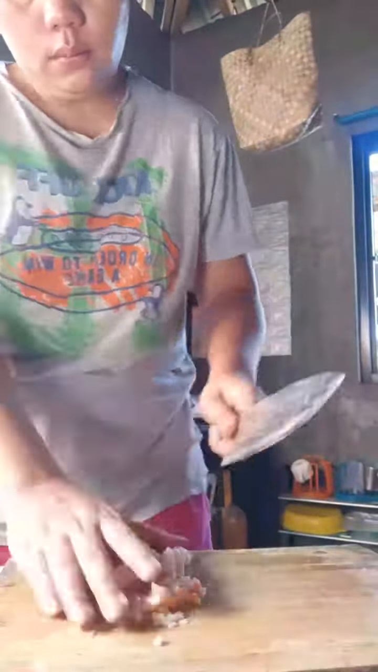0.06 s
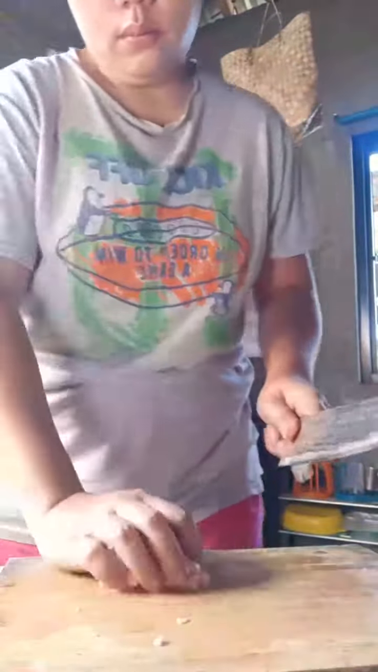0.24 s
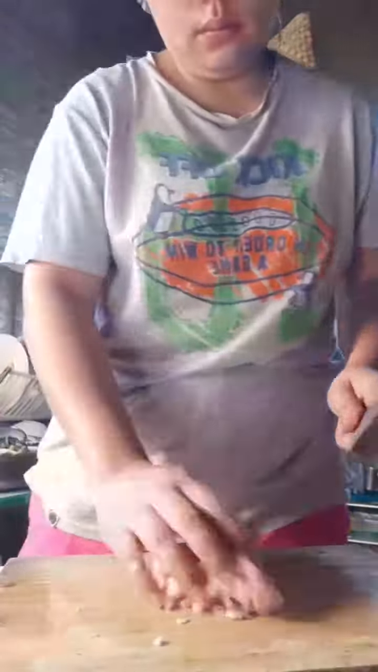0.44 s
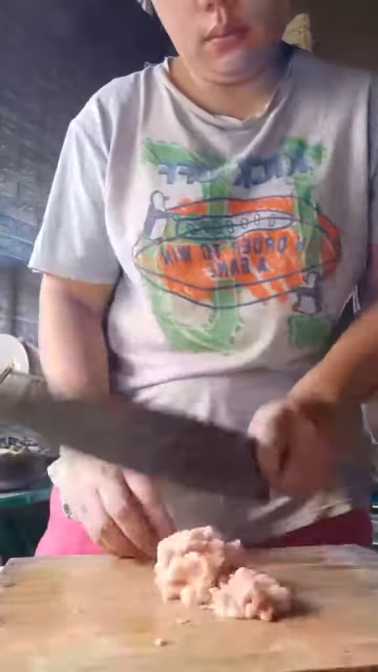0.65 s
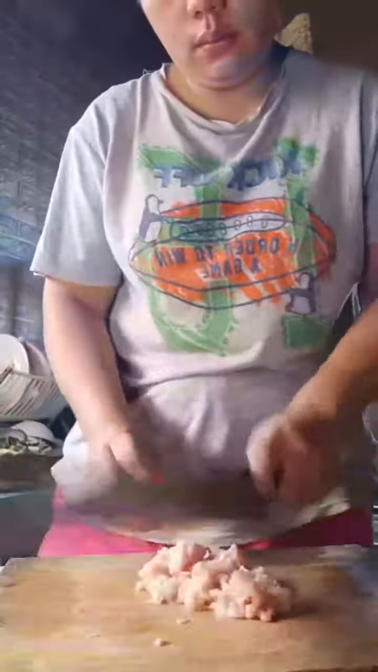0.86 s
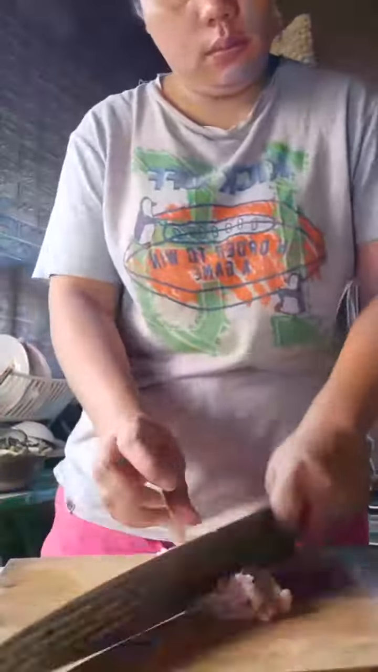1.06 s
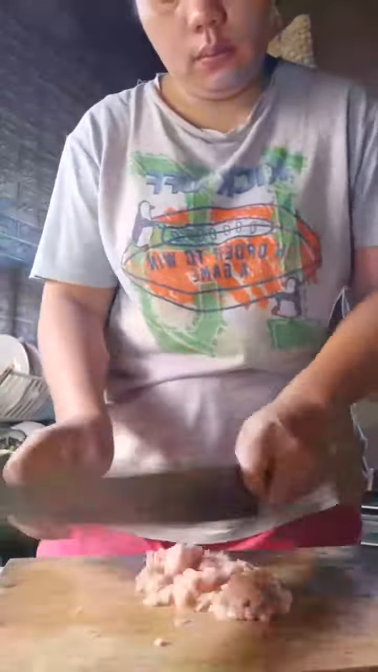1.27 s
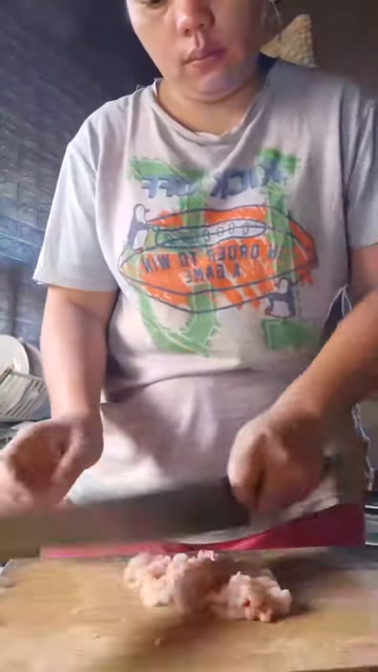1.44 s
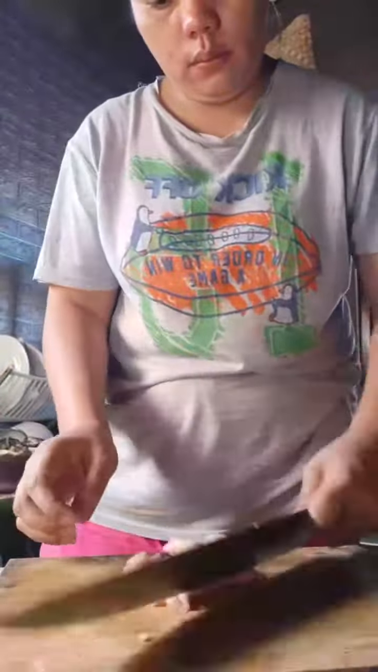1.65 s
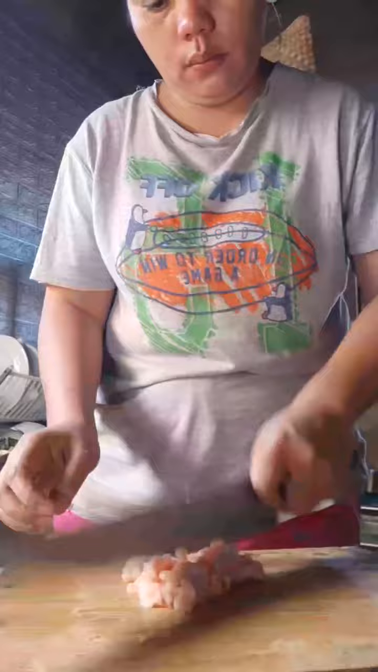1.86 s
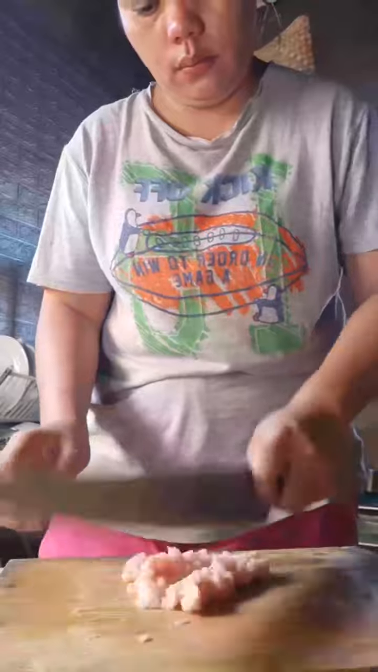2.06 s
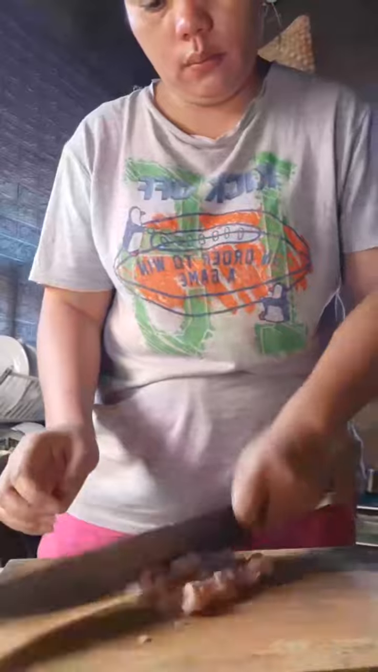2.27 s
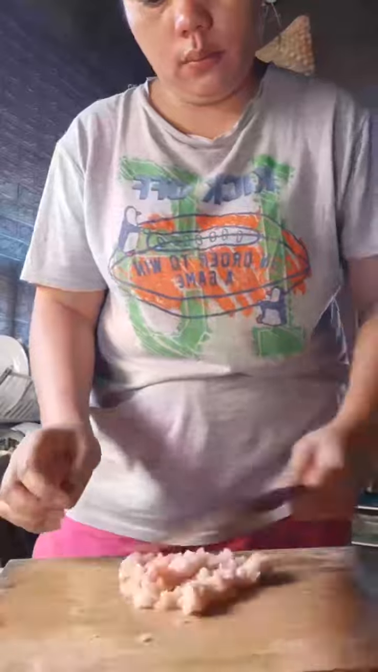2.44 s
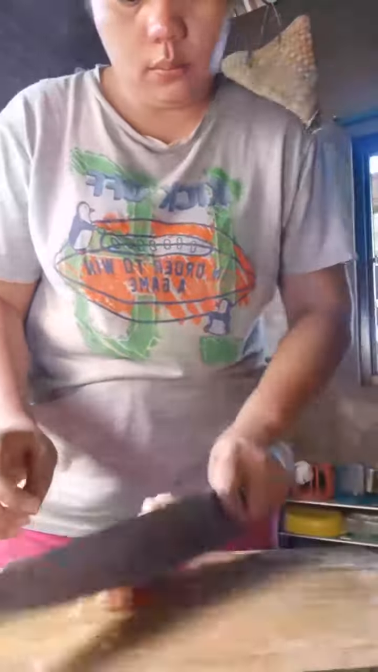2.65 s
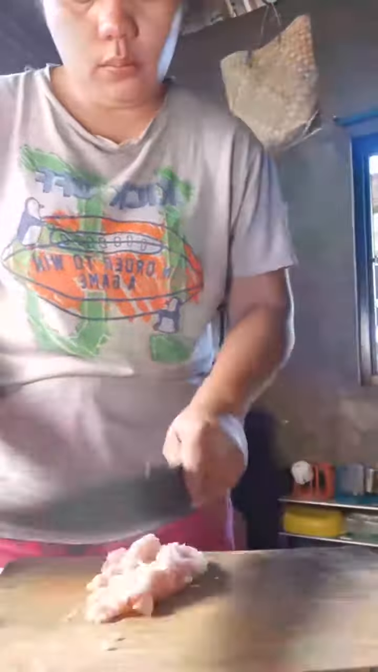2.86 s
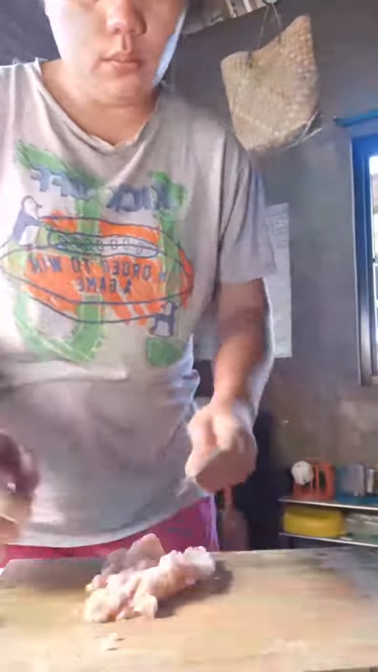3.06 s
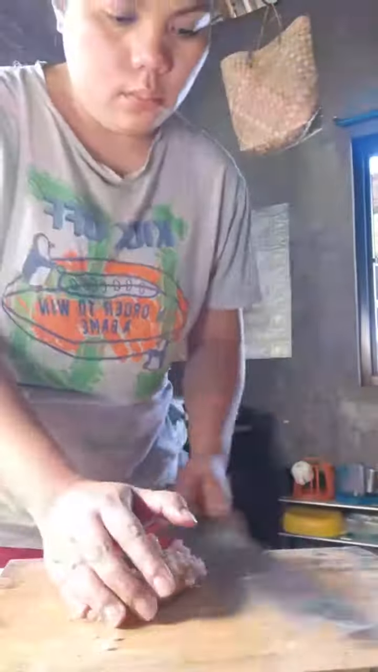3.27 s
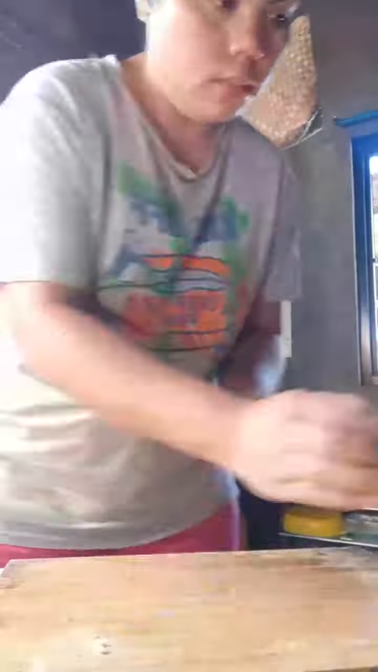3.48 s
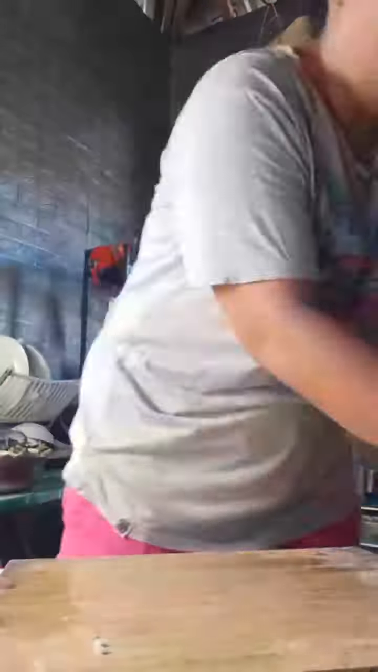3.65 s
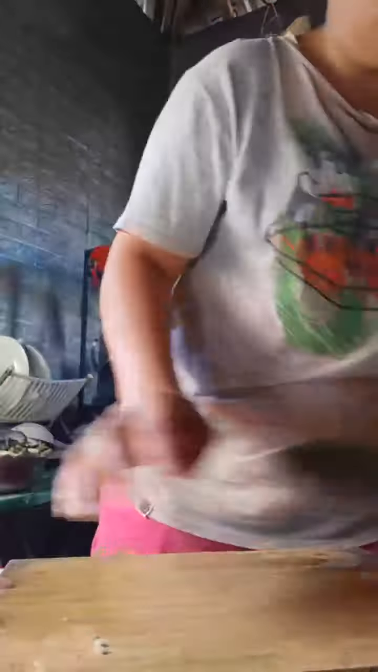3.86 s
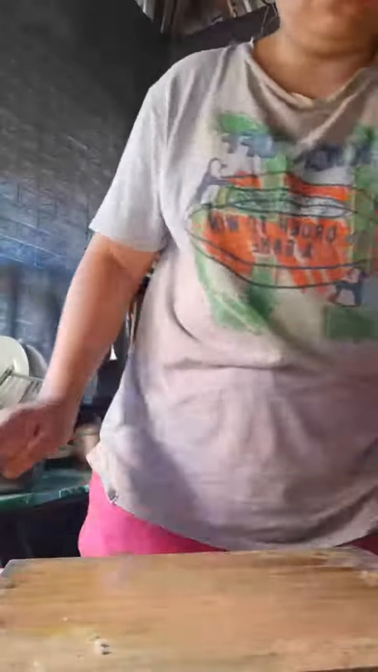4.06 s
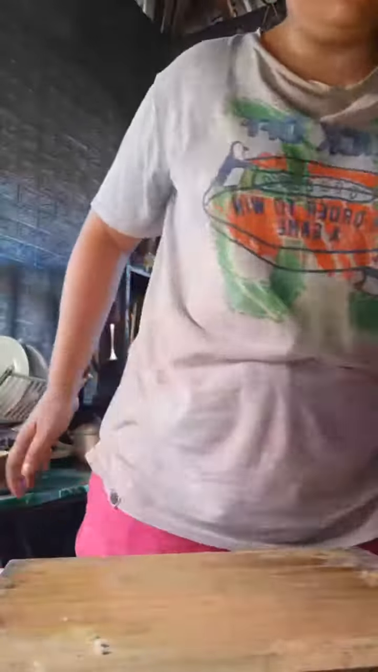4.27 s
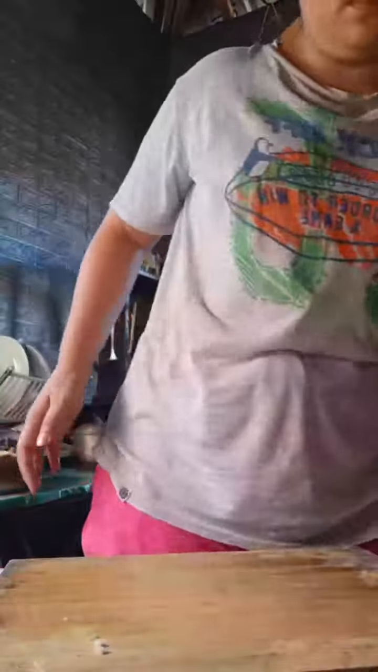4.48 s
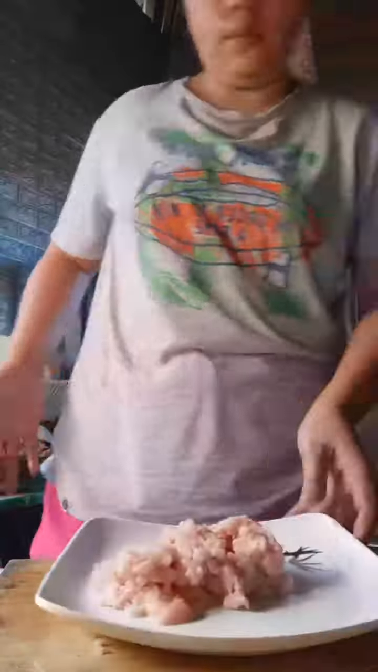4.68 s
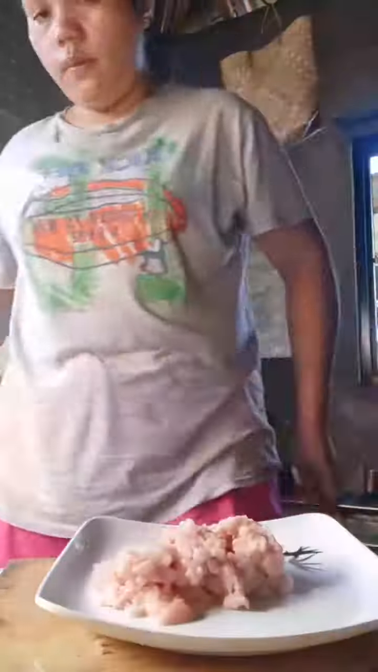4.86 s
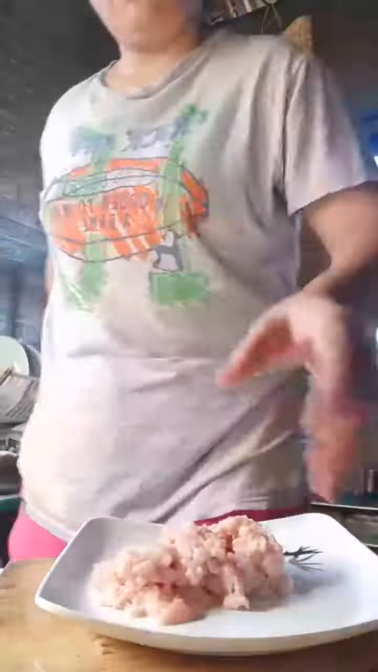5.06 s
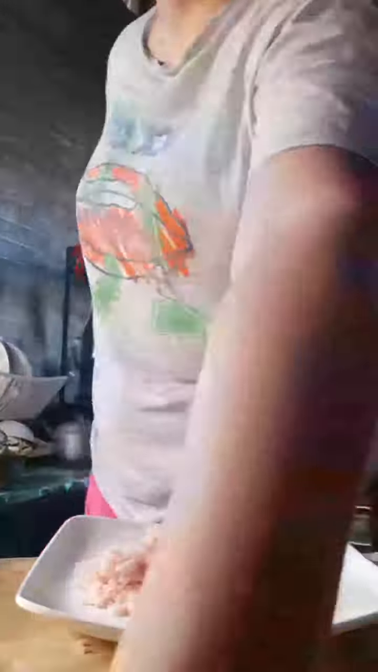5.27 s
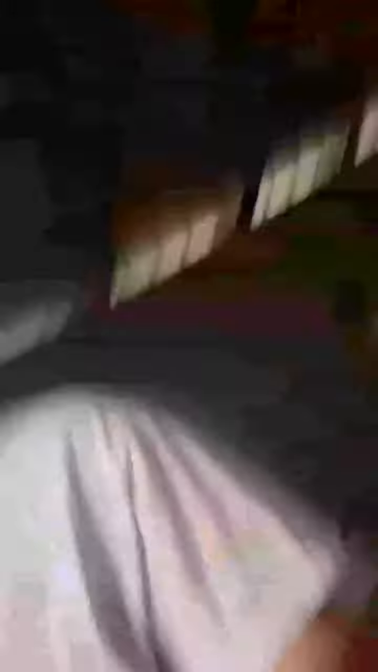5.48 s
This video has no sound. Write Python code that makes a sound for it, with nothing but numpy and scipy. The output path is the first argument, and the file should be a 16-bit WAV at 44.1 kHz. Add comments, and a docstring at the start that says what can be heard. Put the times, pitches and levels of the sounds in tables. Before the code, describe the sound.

A heavy knife strikes a wooden board once at the very start, close to the microphone in a home kitchen. From about 0.7 seconds it minces raw meat rapidly, around eleven strokes a second, each a sharp crack and woody thud with a brief steel ring and a short echo. The strokes ease near 1.7 seconds, resume at 1.9, thin out after 2.5 and end with two hard chops around 3.1 and a light tick at 3.4. Faint hoarse hoots come from far away around 4 and 5 seconds. The board knocks down at 4.2 and 4.3 seconds, and a plate clinks briefly at 4.7. At about 5.4 seconds a hand takes hold of the microphone with a rustle and a sharp click. A quiet, swelling rumble runs underneath, with occasional soft hand rustles and chicks peeping faintly outside.

```python
"""Over a low, swelling rumble, a heavy knife starts mincing raw meat on a thick wooden board, near a phone.
In each stroke the edge cracks through the meat, the blade thuds on the wood, the steel sings briefly
and the open kitchen answers. Chicks peep outside and a hand rustles now and then. The chopping stops
by 3.5 s, and hoarse hoots start far away. The board is set down at about 4.2 s, then a plate clinks
down at 4.7 s. At the end the hand takes hold of the phone."""
import sys
import numpy as np
from scipy import signal
from scipy.fft import rfft, irfft, next_fast_len
from scipy.io import wavfile
from scipy.ndimage import uniform_filter1d

SR = 44100
rng = np.random.default_rng(int(sys.argv[2]) if len(sys.argv) > 2 else 0)


def wav_out(sig):
    """Save sig, one row per channel (or a flat mono array), as 16-bit PCM at SR to the path in sys.argv[1]."""
    wavfile.write(sys.argv[1], SR, np.round(np.clip(np.atleast_2d(sig).T, -1, 1) * 32767).astype(np.int16))


N = 243414
T = np.arange(N) / SR

# How the background swells: t/s, rumble level/dB, hiss level/dB
BACKGROUND_LEVELS = [(0.0, -49, -57), (0.15, -53, -72.5), (0.38, -57.5, -70.5), (0.57, -50.5, -68),
                     (0.75, -45.5, -65), (0.95, -63, -72.5), (1.6, -50, -71), (1.7, -58, -76),
                     (1.85, -58, -77.5), (2.4, -55, -75.5), (2.65, -59, -74), (3.1, -52.5, -68),
                     (3.22, -56, -78.5), (3.38, -73, -78.5), (3.6, -52, -68.5), (4.15, -47.5, -69.5),
                     (4.29, -41.5, -57), (4.4, -53.5, -76), (4.65, -46.5, -63), (5.0, -51, -62.5),
                     (5.27, -44, -62), (5.52, -42.5, -56)]
# Tone of the noise the background is made from: f/Hz, level/dB
BACKGROUND_COLOUR = [(15, -43.5), (25, -7.5), (146, 3.5), (250, -2), (420, -6.5), (829, -11), (1140, -16.5),
                     (1800, -27.5), (2800, -25), (5380, -27), (6800, -40), (7700, -30), (9400, -56.5),
                     (12000, -38.5), (14800, -69.5)]
# Weight landing on wood: t/s, level/dB, push length/ms, pitch factor (held to 0.6-1.9),
# lift of the higher notes/(dB per octave), which depends on where the blow lands
THUDS = [(0.004, -28, 2.5, 0.64, 17), (0.0474, -3, 1.26, 1.43, -6.5), (0.7104, -2, 4.83, 1.73, -2),
         (0.7168, -2, 1.6, 0.88, -2.5), (0.7243, -6, 1.5, 1, -7.5), (0.7983, -14.5, 4.6, 1.05, 0),
         (0.888, -6.5, 1.47, 1.05, -2.5), (0.979, -6.5, 2.74, 1.01, 1.5), (1.0702, -10, 2.2, 0.82, -4.5),
         (1.1632, -2.5, 2, 1.18, -5), (1.2494, -2.5, 1.65, 0.77, -2), (1.3377, -11.5, 1.44, 1.97, -15),
         (1.3417, -7, 2.25, 0.81, -5.5), (1.355, -23.5, 2.2, 1.2, -2), (1.4279, -13.5, 2, 0.6, -6.5),
         (1.5137, -2.5, 3.27, 1.37, 5.5), (1.5963, -9.5, 0.95, 1.57, -6), (1.7089, -22, 1.86, 0.88, 0.5),
         (1.9479, -2.5, 1.35, 0.65, -4.5), (2.0383, -5, 1.5, 0.55, -3), (2.1292, -3, 2.16, 1.24, -2.5),
         (2.2276, -11.5, 1.15, 0.91, -9), (2.3077, -8, 2.56, 1.09, 3.5), (2.397, -11.5, 3.75, 1.25, 5),
         (2.4857, -3, 1.12, 0.98, 2), (2.511, -30, 3.2, 1.1, 4), (2.5994, -20.5, 1.64, 0.63, -5),
         (2.7333, -28, 1.07, 1.51, -9.5), (2.8437, -8, 2.84, 1.51, 2.5), (2.934, -31, 4.3, 1.1, -1),
         (3.0172, -3, 2.02, 0.75, -2), (3.1045, 0, 1.5, 0.84, -10), (3.3636, -35.5, 5.1, 1.26, 8),
         (4.1777, -14, 1.5, 1.16, -7), (4.1948, -19, 0.81, 0.57, 4.5), (4.2067, -18, 0.59, 0.52, -2),
         (4.2095, -21, 2.2, 0.97, 0), (4.269, -33, 1.5, 1.1, 0), (4.282, -24, 2.6, 2.2, 3),
         (4.29, -5.5, 2.3, 1.21, 1), (4.2975, -15, 2.4, 0.97, 0), (4.306, -20, 2.4, 0.97, 0),
         (4.316, -46, 1.3, 0.51, -14), (4.7286, -25, 0.92, 0.47, 1), (4.741, -29.5, 2.7, 1.53, -7),
         (4.753, -26, 1.3, 1.15, 4.5), (4.793, -30.5, 1.25, 1.7, -7)]
# The board's own notes, which each blow retunes and damps: base f/Hz, level/dB, base ring time/s
BOARD_NOTES = [(70.8, -4, 0.017), (148, 3, 0.038), (252.8, -2.5, 0.037), (400.7, -7.5, 0.036),
               (555, -6, 0.032), (972, -20, 0.027), (1289, -17, 0.013)]
# Tone of the room's echo: f/Hz, level/dB
ROOM_COLOUR = [(60, -6), (250, -2.5), (950, -1), (2500, -2), (6000, -5.5), (12000, 0.5)]
# Sharp touches of edge, board or plate; each level is relative within its own layer:
# t/s, crack level/dB, crack fade/ms, rap level/dB, clatter level/dB, blade song level/dB
CONTACTS = [(0.0461, -16.5, 0.98, -38, -20, -30), (0.7124, -13.5, 1.1, -31, -44, -20.5),
            (0.717, -18.5, 1.5, -19, -17.5, -27), (0.7223, -18.5, 1.8, -21, -44, -28.5),
            (0.794, -28.5, 8.2, -59, -40.5, -44), (0.8847, -31.5, 0.97, -20, -61, -39),
            (0.8877, -22, 4, -47, -36.5, -36), (0.9046, -34, 1.4, -34, -77, -73),
            (0.974, -8, 0.78, -11, -30, -40), (0.9774, -17, 1.7, -55, -73, -35),
            (0.9811, -20.5, 1.8, -37, -74, -45), (0.9914, -27, 1.8, -50, -76, -61),
            (1.067, -7.5, 0.33, -14.5, -27.5, -45), (1.1601, -13.5, 3.5, -21.5, -33.5, -43),
            (1.163, -20.5, 2.2, -18, -45.5, -34.5), (1.2459, -13, 1.4, -15.5, -26, -37),
            (1.3379, -12.5, 3.3, -12.5, -20.5, -21.5), (1.425, -17, 1, -13.5, -34, -31),
            (1.433, -33, 1.5, -55, -47, -60), (1.514, -12, 1.6, -11.5, -20.5, -41.5),
            (1.527, -29.5, 4, -45, -30, -54.5), (1.5965, -18.5, 1.3, -51, -39.5, -46),
            (1.7057, -23, 1.75, -31.5, -40.5, -60), (1.947, -12.5, 1, -12.5, -17.5, -29.5),
            (2.0369, -25, 2.5, -22, -33.5, -38), (2.1276, -19, 4.1, -17, -29, -37),
            (2.1445, -25, 1.2, -33, -39.5, -48.5), (2.2218, -11.5, 0.59, -21.5, -47, -36.5),
            (2.2262, -28, 1, -50, -45.5, -55), (2.3067, -18.5, 0.73, -38, -41, -60),
            (2.394, -18.5, 0.85, -21.5, -39.5, -42.5), (2.4848, -9, 1.7, -24, -24, -43),
            (2.597, -12.5, 1.6, -35, -32.5, -42.5), (2.618, -27, 4.3, -56, -44.5, -50),
            (2.7313, -48.5, 0.94, -58.5, -55.5, -69), (2.84, -20.5, 0.76, -20, -33.5, -53),
            (2.931, -31.5, 4.4, -68, -66.5, -62), (2.952, -42, 2.6, -69, -63.5, -72),
            (3.0142, -9, 1.6, -13.5, -20.5, -37.5), (3.1025, -9, 1.8, -18, -13.5, -32),
            (3.3626, -19, 1.1, -55.5, -37.5, -51), (3.4094, -38.5, 2.1, -60.5, -52.5, -62),
            (4.1764, -22, 2.8, -20.5, -39.5, -55.5), (4.1916, -36, 1.8, -31, -58, -67),
            (4.2069, -34, 1.8, -33, -48, -63), (4.2877, -13.5, 2.2, -22, -22, -38),
            (4.3149, -22, 2.5, -15, -44.5, -58), (4.727, -12, 2.2, -29.5, -38.5, -39),
            (4.7404, -12, 0.88, -30, -32, -47.5)]
# How the microphone colours sharp sounds: f/Hz, level/dB
MIC_COLOUR = [(20, -21.5), (60, 16.5), (5500, 2.5), (7000, -9.5), (9000, -38.5), (12000, -28), (15000, -49)]
# Tone of board, table and walls shaking after a stroke: f/Hz, level/dB
CLATTER_COLOUR = [(35, -31.5), (60, -19.5), (177, -1), (602, -11), (912, -6.5), (1780, -13.5), (2140, -12),
                  (3810, -13), (8940, -32), (12100, -35), (14800, -44)]
# The steel blade's own notes: f/Hz, level/dB
BLADE_NOTES = [(2150, -5.5), (3780, -14.5), (5780, -9.5), (13600, -3)]
# Chicks outside: t/s, level/dB, starting f/Hz, length/s, pitch wobble/Hz
PEEPS = [(.135, -57, 2800, .035, 90), (.555, -48, 2490, 0.051, 60), (.572, -41.5, 2780, .037, 60),
         (1.82, -66.5, 2860, 0.034, 90), (2.083, -67, 2770, .035, 70), (3.22, -71.5, 2780, .11, 60),
         (3.625, -56, 2805, 0.048, 110), (3.77, -67, 2480, 0.089, 70.5), (3.848, -53, 2810, .04, 89),
         (4.67, -59, 2920, 0.1, 120), (5.22, -61, 2800, .06, 110)]
# A hand on meat, cloth and phone case: peak t/s, level/dB, fade/ms, relative sizzle level/dB
RUSTLES = [(.205, -66, 33, -30), (0.312, -58, 42, -13), (0.371, -60, 8.1, -23), (0.389, -59, 4, -20),
           (0.407, -54.5, 3.4, -15), (0.536, -46, 3.4, -23), (0.577, -58, 73, -10.5), (0.708, -28, 2.8, -7),
           (0.953, -57.5, 0.94, -25), (2.026, -49, 1.9, -27), (2.6944, -58.5, 2.3, -2),
           (3.38, -45, 3.1, -16.5), (4.02, -65, 12, -25), (4.09, -66, 13, -25), (4.504, -57, 26, -14),
           (5.064, -57.5, 12, -12), (5.198, -58, 25, -37), (5.366, -46, 26, -10), (5.372, -22, 1, -23),
           (5.419, -10.5, 3.37, -18), (5.493, -60, 11, 2)]
# Distant hoarse hoots: t/s, level/dB, starting f/Hz, length/s, pitch wobble/Hz
HOOTS = [(3.915, -51.5, 1230, 0.08, 196), (4.035, -45, 1020, 0.026, 25), (4.075, -53, 994, 0.03, 25),
         (4.915, -53.5, 780, 0.062, 25), (5.1, -59, 862, .11, 25), (5.19, -46.5, 890, .093, 25)]
# The plate's own notes, lowered and shortened in plate(): base f/Hz, level/dB, base ring time/s
PLATE_NOTES = [(988, 1.5, 0.04), (2920, -0.5, 0.049), (5020, -7.5, 0.042)]
# The plate touching down: t/s, level/dB
PLATE_HITS = [(4.7265, -18.5), (4.7407, -32)]
# How much the phone's two microphone holes hear differently: f/Hz, level/dB
SIDE_COLOUR = [(1500, -70.5), (2800, -70), (4500, -21), (8000, -17.5), (12000, -15.5)]


def undb(db):
    """Turn decibels into a number to multiply by."""
    return 10 ** (np.asarray(db) / 20)


def unit(x):
    """Scale to an average strength (rms) of 1."""
    return x / np.sqrt(np.mean(x ** 2))


def colour(x, points):
    """Turn pitches up or down along a curve of (f/Hz, level/dB) points."""
    hz, db = np.transpose(points)
    size = next_fast_len(len(x))
    f = np.fft.rfftfreq(size, 1 / SR) + 1
    gain = undb(np.interp(np.log(f), np.log(hz), db))
    return irfft(rfft(x, size) * gain, size)[:len(x)]


def band(x, lo_hz, hi_hz):
    """Keep the sound between two frequencies."""
    return signal.sosfilt(signal.butter(2, [lo_hz, hi_hz], "bandpass", fs=SR, output="sos"), x)


def wander(per_s):
    """A smooth random curve, roughly within -1 to 1, with per_s new values a second."""
    k = int(SR / per_s)
    steps = np.repeat(rng.standard_normal(N // k + 1), k)
    return 1.4 * uniform_filter1d(uniform_filter1d(steps, k), k)[:N]


def add(out, start_s, x):
    """Mix x into out from start_s on."""
    i = max(int(start_s * SR), 0)
    out[i:i + len(x)] += x[:N - i]


def decay(t, ring_s):
    """Fade by 60 dB over the ring time."""
    return np.exp(-np.log(1000) * t / ring_s)


def swell(t, rise_ms, fall_ms):
    """Grow until t = 0, then die away."""
    return np.exp(-1000 * np.abs(t) / np.where(t < 0, rise_ms, fall_ms))


def ring(notes, pitch, hold, lift_db=0):
    """A struck thing sounds its own fading notes; hold scales their ring times."""
    t = T[:SR // 10]
    return sum(undb(db + lift_db * np.log2(hz / 200)) * np.sin(2 * np.pi * hz * pitch * t)
               * decay(t, ring_s * hold) for hz, db, ring_s in notes)


def background():
    """Rumble and hiss: narrow bands of noise flicker alone and swell together in four broad ranges."""
    times, rumble, hiss = np.transpose(BACKGROUND_LEVELS)
    rumble, hiss = np.interp(T, times, rumble), np.interp(T, times, hiss)
    levels = [rumble - 7, rumble, rumble + 0.48 * (hiss - rumble) + 2, hiss]  # deep bass up to treble
    edges_hz, flicker_db = (115, 470, 1700), (1.2, 2.05, 3.2, 1.8)
    size = next_fast_len(N)
    octaves = np.log2(np.fft.rfftfreq(size, 1 / SR) + 1)
    spectrum = rfft(colour(rng.standard_normal(size), BACKGROUND_COLOUR))
    ranges = np.zeros((len(levels), N))
    for hz in 25 * 2 ** np.arange(0, 9.6, 1 / 3):
        window = np.cos(np.pi / 2 * np.clip(3 * (octaves - np.log2(hz)), -1, 1)) ** 2
        k = np.searchsorted(edges_hz, hz)
        ranges[k] += irfft(spectrum * window, size)[:N] * undb(flicker_db[k] * wander(18))
    return sum(unit(noise) * undb(db) for noise, db in zip(ranges, levels))


def blow(push_ms, pitch, hold, lift_db):
    """One push into the board, duller if longer. The air is drawn down first, then springs back."""
    n = int(push_ms * SR / 1000)
    push = np.sin(np.pi * np.arange(n) / n)
    motion = signal.fftconvolve(push, ring(BOARD_NOTES, pitch, hold, lift_db))
    pressure = -np.diff(motion, prepend=0)
    return pressure / np.abs(pressure).max()


def thuds():
    """The knife's weight, or a thing put down, sets off the board's low notes."""
    out, chopping_ends_s = np.zeros(N), 4.0
    for s, db, push_ms, pitch, lift_db in THUDS:
        hold = 0.59 * np.exp(-0.0085 * db - 0.037 * lift_db)  # light, dull blows ring longer
        if s > chopping_ends_s:
            hold *= 1.46  # no meat or hand damps the board
        add(out, s, undb(db) * blow(push_ms, np.clip(pitch, 0.6, 1.9), hold, lift_db))
    return out


def room(x, ring_s=0.13, level_db=-13.5):
    """The table and nearby walls send each stroke back as a short, woody echo."""
    t = T[:SR // 3]
    tail = rng.standard_normal(len(t)) * (1 - np.exp(-t / 0.0049)) * decay(t, ring_s)
    echo = signal.fftconvolve(x, tail / np.linalg.norm(tail))[:N]
    return colour(echo, ROOM_COLOUR) * undb(level_db)


def cracks():
    """The edge cuts meat, or hard things meet: a tiny burst of noise topped by a faint sizzle."""
    out, sizzle, lead_s = np.zeros(N), np.zeros(N), 0.02
    t = T[:2600] - lead_s - 0.0005
    for s, db, fall_ms, *_ in CONTACTS:
        burst = rng.standard_normal(len(t)) * swell(t, rise_ms=0.7, fall_ms=fall_ms)
        hz = 2600 + 500 * fall_ms  # a longer crack tears more fibre and is brighter
        body = band(burst, hz / 1.82, hz * 1.88) + undb(2.5) * burst
        add(out, s - lead_s, undb(db) * body / np.abs(body).max())
        top = band(burst, 7500, 14500)
        add(sizzle, s - lead_s, undb(0.4 * db - 43.3) * top / np.abs(top).max())
    return colour(out, MIC_COLOUR) + sizzle


def raps():
    """A very quick tap on the wood gives a higher, shorter knock than a thud."""
    out = np.zeros(N)
    knock = -blow(push_ms=0.5, pitch=1.685, hold=0.4, lift_db=0.1)
    for s, _, _, db, _, _ in CONTACTS:
        add(out, s, undb(db + 8) * knock)
    return out


def clatter(crunch_db=4.5):
    """Board, table and walls shake after a stroke; wet meat breaks the treble into grains."""
    out, t = np.zeros(N), T[:SR // 6]
    noise = unit(colour(rng.standard_normal(N) * undb(2 * wander(300)), CLATTER_COLOUR))
    wood = signal.sosfilt(signal.butter(1, 1500, fs=SR, output="sos"), noise)
    treble = (noise - wood) * unit(undb(crunch_db * wander(450)))
    for s, _, _, _, db, _ in CONTACTS:
        span = slice(int(s * SR), int(s * SR) + len(t))
        ring_s = 0.12 * np.exp(-0.0282 * (db + 31))  # the pressed blade damps a hard stroke sooner
        fade = (1 - np.exp(-t / 0.0025)) * decay(t, ring_s)
        add(out, s, undb(db) * fade * (wood[span] + fade ** 0.47 * treble[span]))  # treble dies first
    return out


def blade_song(peak_ms=12.5, width_ms=3.43):
    """The steel sings as it springs free of the wood, a little differently each time."""
    out, t = np.zeros(N), T[:2600]
    for s, *_, song_db in CONTACTS:
        for hz, db in BLADE_NOTES:
            extra_db, detune, late_ms, phase = rng.normal(0, [1, 0.013, 2.1, 3])
            tone = np.sin(2 * np.pi * hz * (1 + detune) * t + phase)
            shape = np.exp(-0.5 * ((1000 * t - peak_ms - late_ms) / width_ms) ** 2)
            add(out, s, undb(song_db + db + extra_db) * tone * shape)
    rattle = 1 + 0.5 * wander(350)
    return colour(out * rattle, MIC_COLOUR)


def calls(table, sag_hz_per_s, octave_db, roughness, wobbles_per_s, echo_db):
    """Peeps or hoots: short, shaky, falling notes with an octave on top, blurred by the yard's echo."""
    out, wobble = np.zeros(N), wander(wobbles_per_s)
    for s, db, start_hz, length_s, wobble_hz in table:
        t = T[:int(length_s * SR)]
        hz = start_hz - sag_hz_per_s * t + wobble_hz * wobble[int(s * SR):][:len(t)]
        phase = 2 * np.pi * np.cumsum(hz) / SR
        tone = np.sin(phase) + undb(octave_db) * np.sin(2 * phase)
        shape = np.sin(np.pi * (t / length_s) ** 0.64)
        add(out, s, undb(db) * shape * tone)
    out *= 1 + roughness * wander(180)
    t = T[:SR // 5]
    yard = rng.standard_normal(len(t)) * np.exp(-t / 0.025)
    return out + undb(echo_db) * signal.fftconvolve(out, yard)[:N]


def rustles():
    """A rubbing hand makes noise that swells and dies."""
    out, sizzle = np.zeros(N), np.zeros(N)
    t = T[:SR // 4] - 0.1
    for s, db, fall_ms, sizzle_db in RUSTLES:
        noise = rng.standard_normal(len(t))
        hz = 5560 / fall_ms ** 0.21  # longer rubs are duller
        rub = unit(band(noise, hz / 1.05, hz * 2.53)) + undb(-8) * band(noise, 1300, 12000)
        shape = undb(db) * swell(t, 0.54 * fall_ms, fall_ms)
        add(out, s + t[0], shape * rub)
        add(sizzle, s + t[0], shape * undb(sizzle_db) * unit(band(noise, 6400, 22000)))
    return colour(out, MIC_COLOUR) + sizzle


def plate():
    """The plate touches down twice and rings with a short clink."""
    out = np.zeros(N)
    for s, db in PLATE_HITS:
        add(out, s, undb(db) * ring(PLATE_NOTES, pitch=0.93, hold=0.6))
    return out


def scene():
    """Mix all the sounds, the same for left and right."""
    strokes = thuds() + cracks() + raps() + clatter() + plate()
    song = blade_song()
    echo = room(strokes + undb(-12) * song)  # the thin song hardly stirs the table
    peeps = calls(PEEPS, sag_hz_per_s=900, octave_db=-9.5, roughness=0.43, wobbles_per_s=580, echo_db=-32)
    hoots = calls(HOOTS, sag_hz_per_s=1130, octave_db=-32, roughness=0.53, wobbles_per_s=440, echo_db=-27)
    mono = background() + strokes + song + echo + peeps + rustles() + hoots
    return np.array([mono, mono])


def record(dry, top_hz=14300):
    """The phone's two microphone holes hear alike except in the treble; peaks are rounded, the top cut."""
    scatter = rng.standard_normal(256) * np.exp(-np.arange(256) / 110)
    smeared = signal.fftconvolve(dry[0], scatter / np.linalg.norm(scatter))[:N]
    side = colour(smeared, SIDE_COLOUR)
    rounded = np.tanh(0.76 * (dry + np.array([side, -side]))) / 0.83
    return signal.sosfilt(signal.ellip(10, 0.2, 80, top_hz, fs=SR, output="sos"), rounded)


dry = scene()
out = record(dry)
wav_out(out)
```